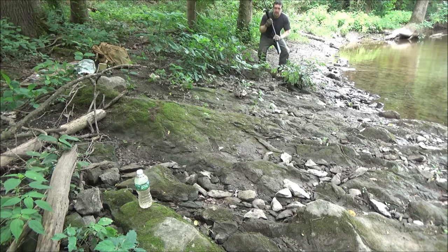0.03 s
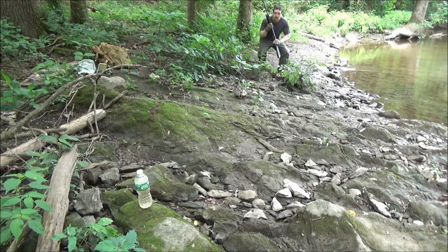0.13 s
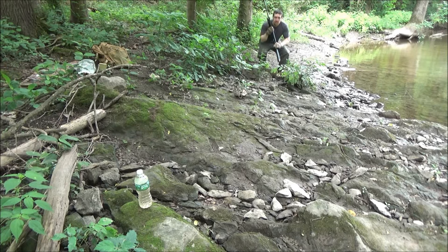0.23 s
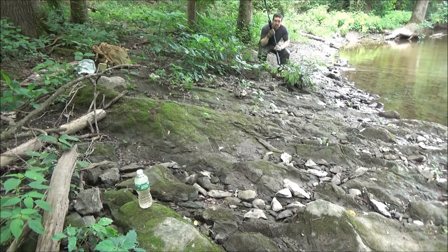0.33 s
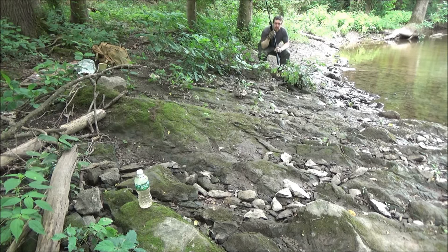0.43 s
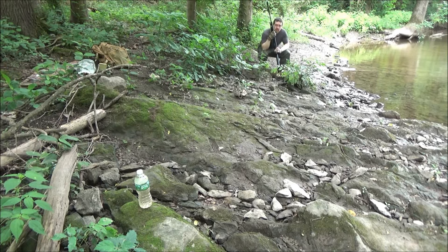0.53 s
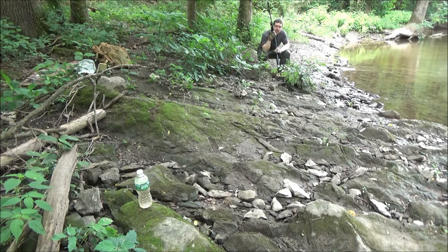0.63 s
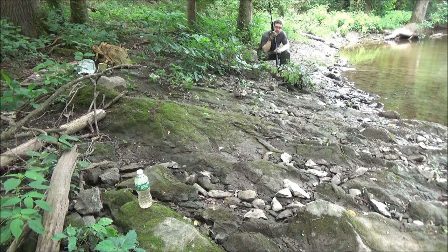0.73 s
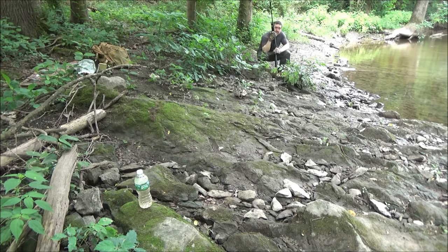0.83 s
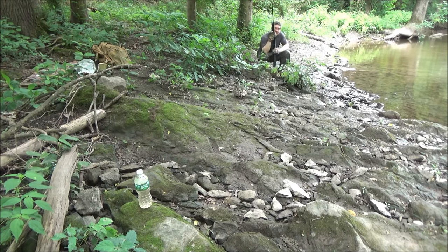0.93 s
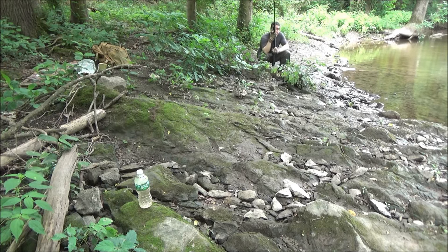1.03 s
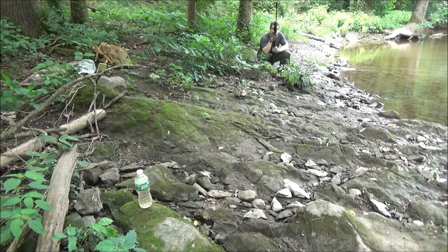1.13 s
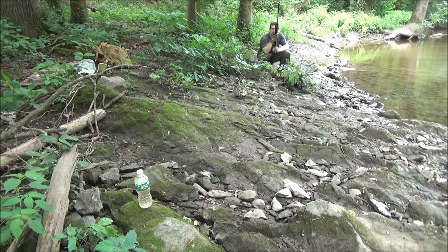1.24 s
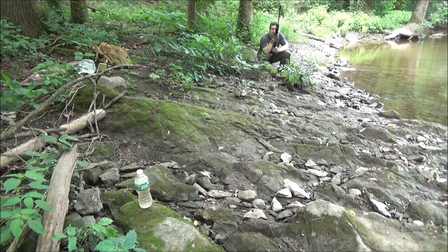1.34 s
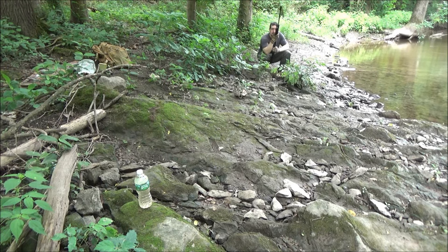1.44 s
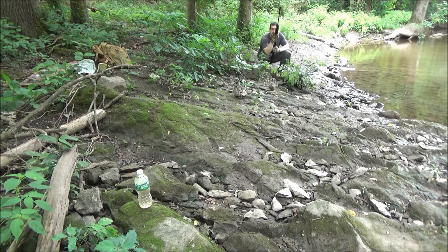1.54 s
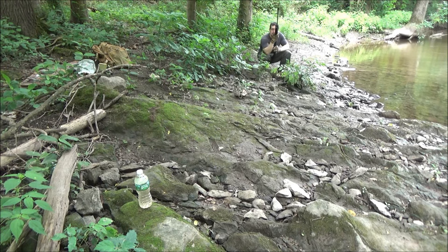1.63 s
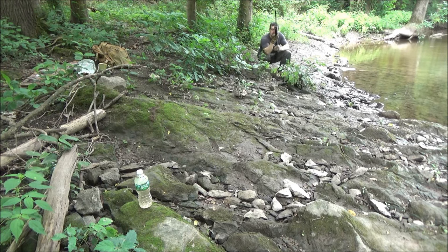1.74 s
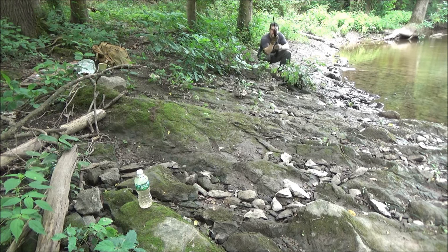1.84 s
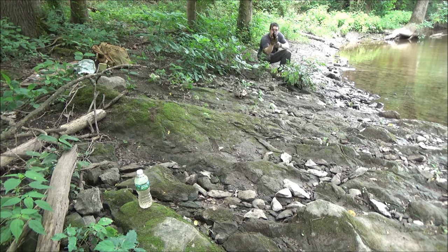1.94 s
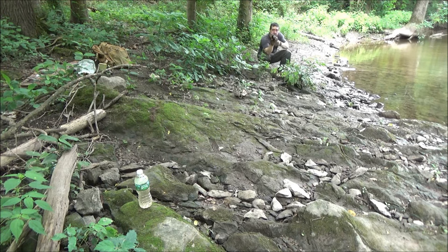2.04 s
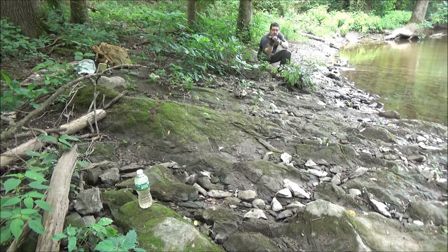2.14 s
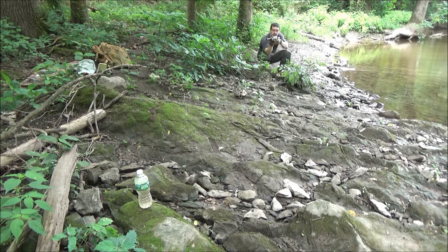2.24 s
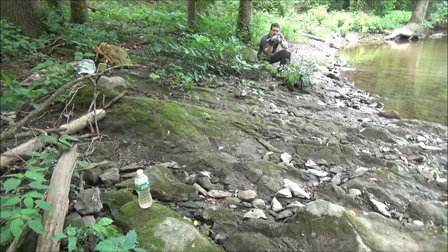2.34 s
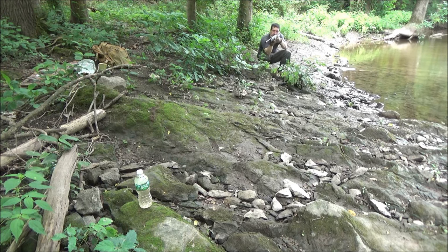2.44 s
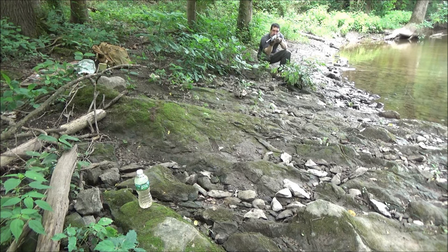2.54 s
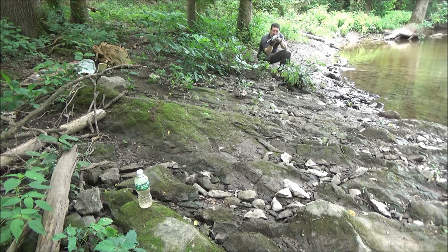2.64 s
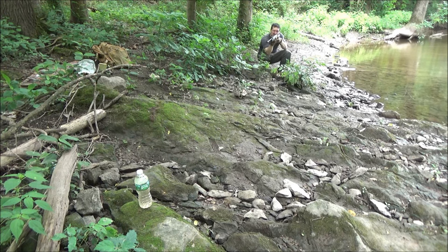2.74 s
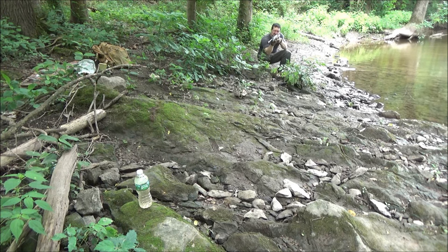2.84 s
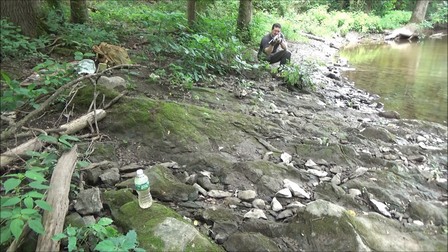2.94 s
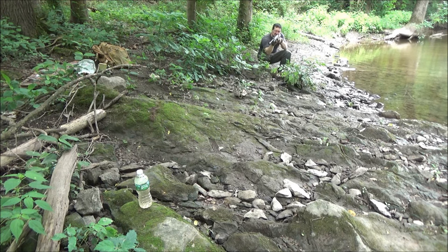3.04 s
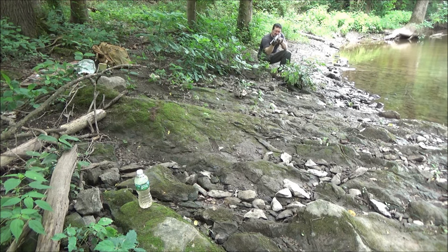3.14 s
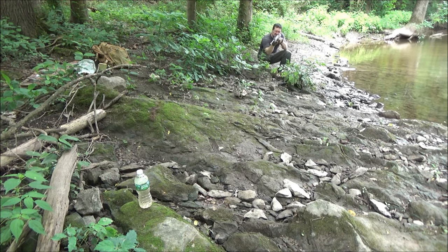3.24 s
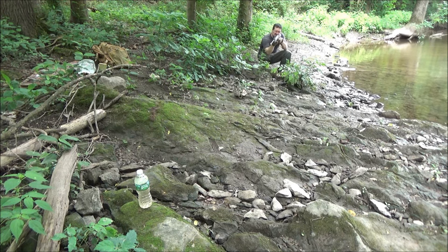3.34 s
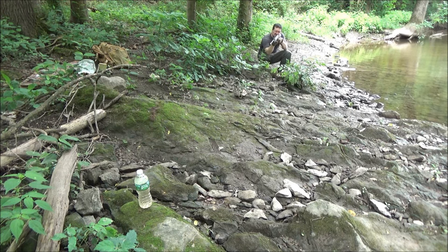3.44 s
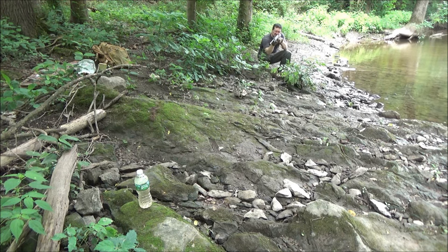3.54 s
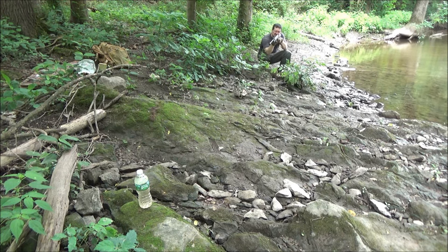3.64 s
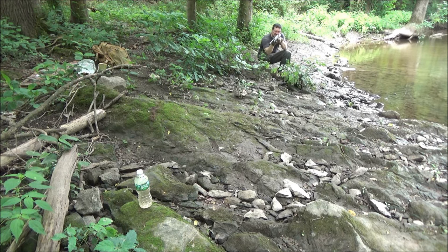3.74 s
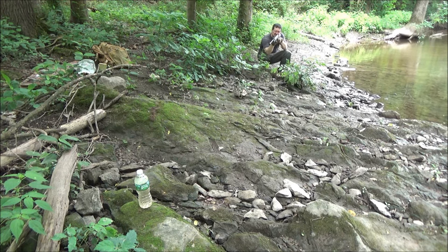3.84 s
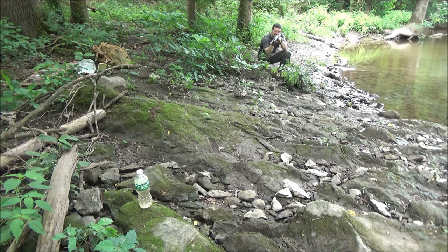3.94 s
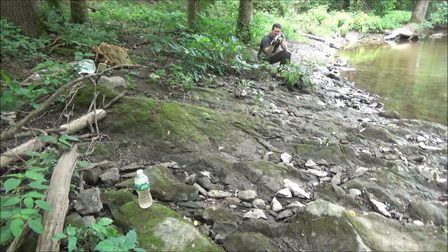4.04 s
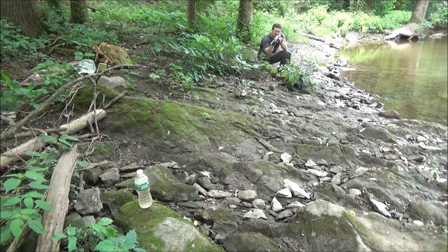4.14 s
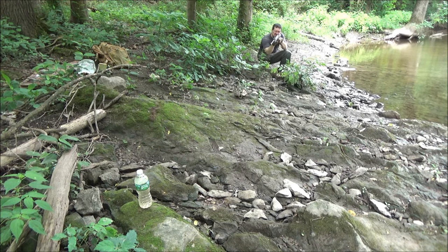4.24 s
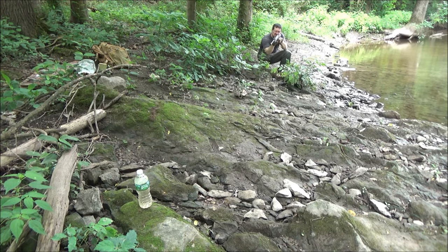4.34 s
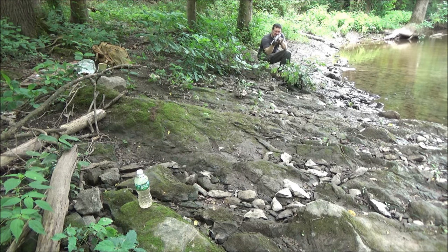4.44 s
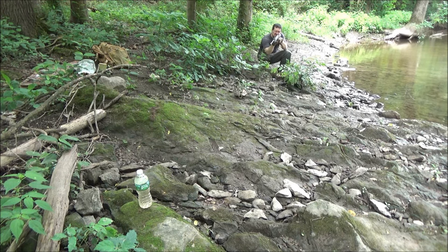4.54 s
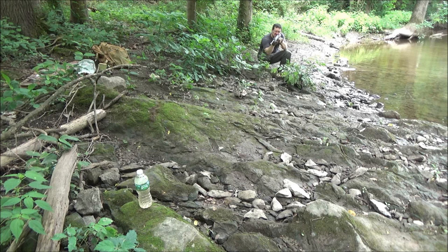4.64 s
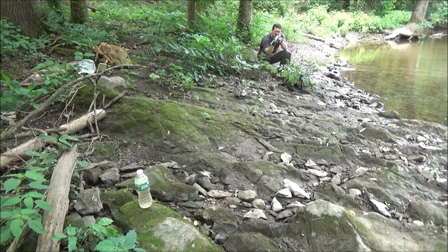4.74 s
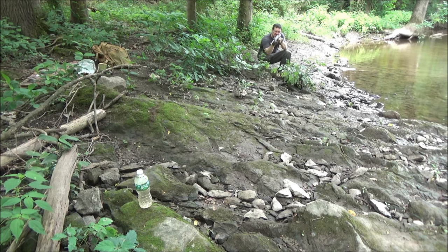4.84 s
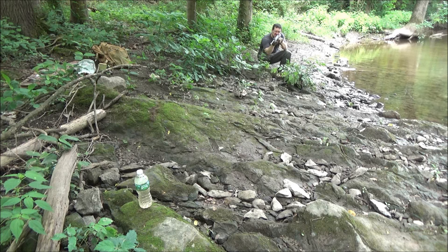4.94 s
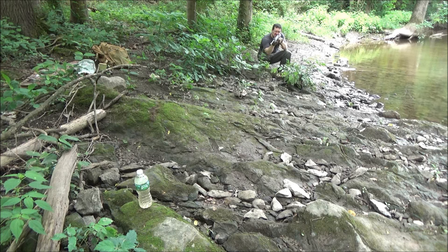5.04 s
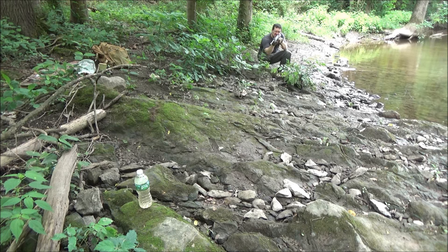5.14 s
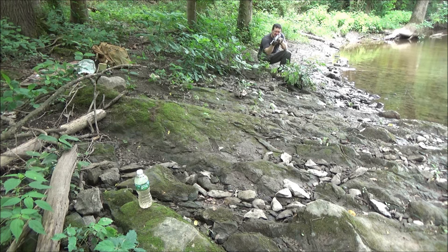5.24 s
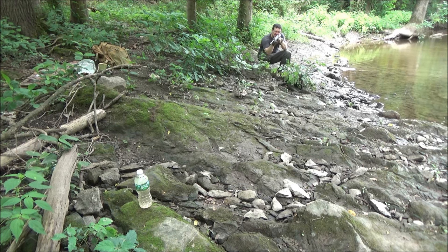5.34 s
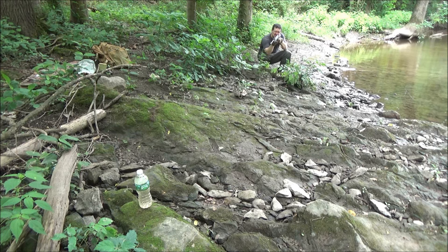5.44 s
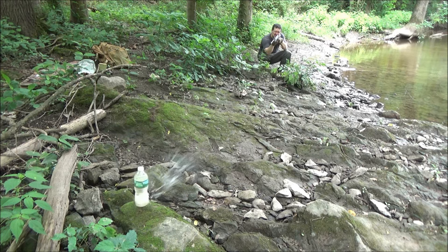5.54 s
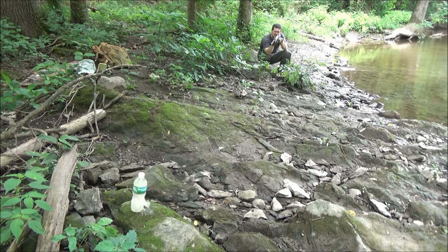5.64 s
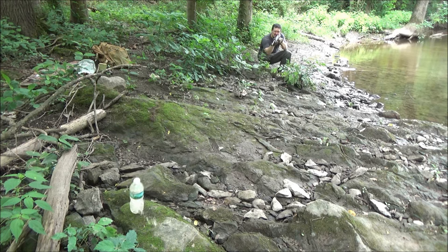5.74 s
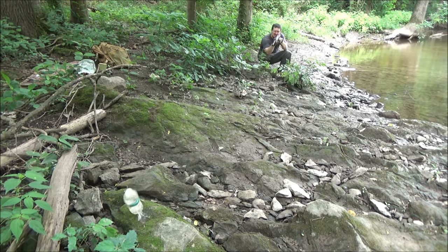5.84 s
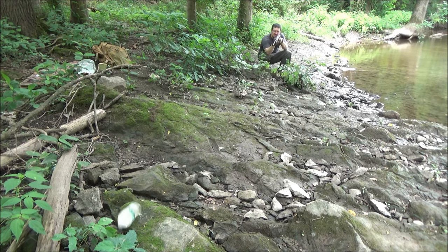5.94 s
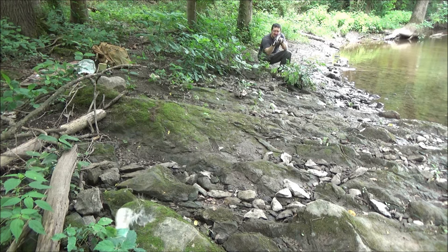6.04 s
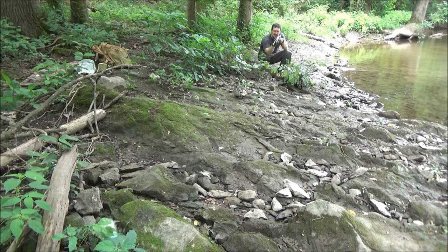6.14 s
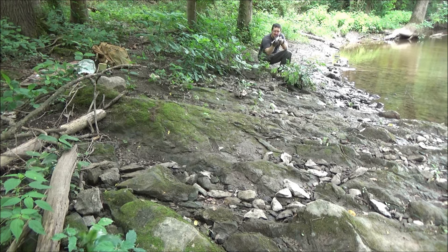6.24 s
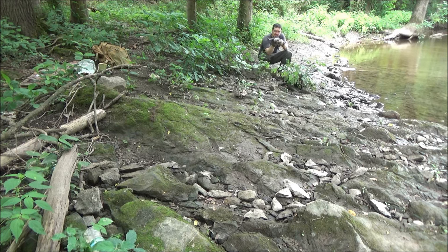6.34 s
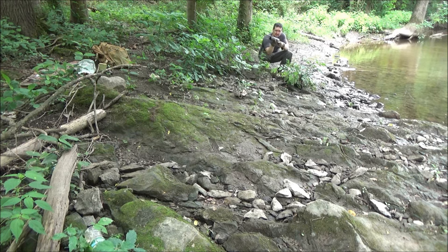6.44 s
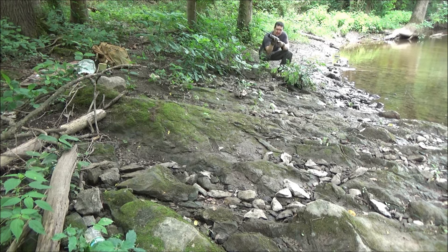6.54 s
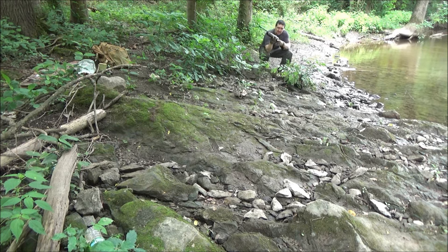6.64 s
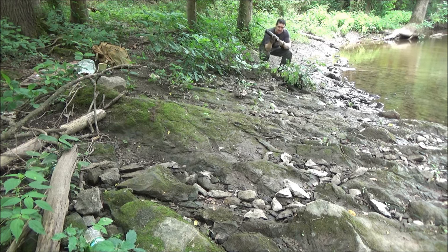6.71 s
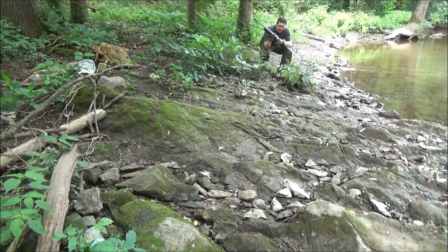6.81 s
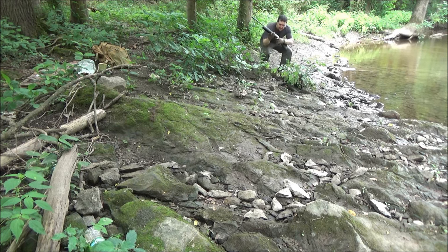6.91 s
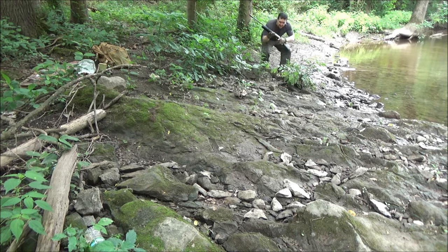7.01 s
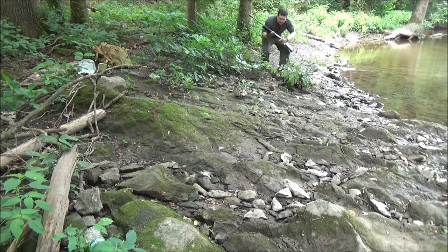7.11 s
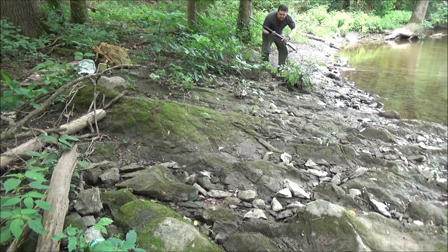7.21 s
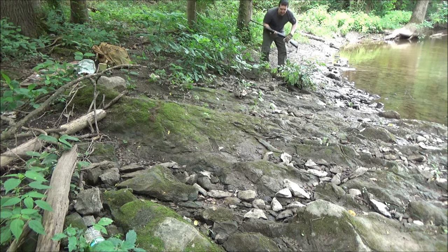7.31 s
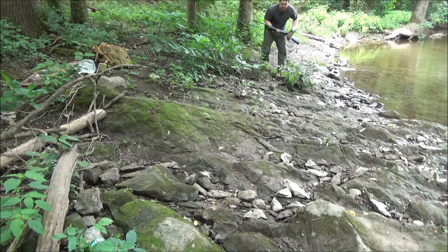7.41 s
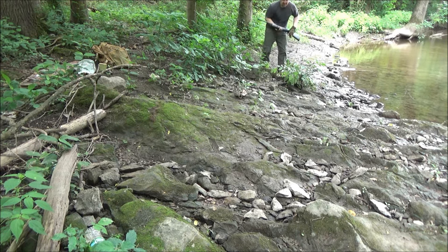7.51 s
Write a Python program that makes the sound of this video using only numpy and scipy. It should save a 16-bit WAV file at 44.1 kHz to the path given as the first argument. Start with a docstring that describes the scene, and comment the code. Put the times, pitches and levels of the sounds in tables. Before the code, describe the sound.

A creek rushes steadily over stones in a wood, with a light hiss and a faint low rumble. Through the first five and a half seconds birds give short whistles, paired chirps and high, sharp peeps, with a quick falling song at about 2.7 seconds. A twig snaps at 5 seconds. At 5.6 seconds an air rifle fires: one sharp crack merged with the pellet's smack on a plastic water bottle, by far the loudest sound. An echo spreads through the trees and fades over a second or so. The creek and everything else drop sharply in level at the shot and recover only slowly. At about 6.1 and 6.3 seconds the bottle tumbles onto stones with two dull, slightly crackly knocks. Very faint drops patter, and the rifle clicks softly around 6.7 and 6.9 seconds. The quieted creek continues until about 7.5 seconds.

```python
"""Air rifle by a woodland creek

A creek rushes over stones while birds whistle, chirrup, peep and sing, scattered by trunks and leaves.
A twig snaps. An air rifle fires at a water bottle: the report and the pellet's smack echo from the
trees, drops patter, the bottle tumbles off its rock and the rifle clicks as it is lowered.
The camera's gain control ducks at the shot and recovers only slowly."""
import sys
import numpy as np
from scipy import signal
from scipy.fft import rfft, irfft, next_fast_len
from scipy.io import wavfile
from scipy.ndimage import uniform_filter1d, map_coordinates

SR = 44100
rng = np.random.default_rng(int(sys.argv[2]) if len(sys.argv) > 2 else 0)


def inscribe(sig):
    """Save sig as 16-bit PCM at rate SR to the path in sys.argv[1].

    A 1-D sig is mono; a 2-D sig holds one channel per row.
    Samples are clipped to [-1, 1] before scaling.
    """
    pcm = np.round(np.clip(np.atleast_2d(sig).T, -1, 1) * 32767)
    wavfile.write(sys.argv[1], SR, pcm.astype(np.int16))


N = 333837


def amp(db):
    """Decibels to gain."""
    return 10 ** (np.asarray(db) / 20)


def unit(x):
    """Scale to rms 1."""
    return x / np.sqrt(np.mean(x ** 2) + 1e-20)


def along(points, hz):
    """Interpolate (freq_hz, value) points on a log frequency axis."""
    freqs_hz, values = np.transpose(points)
    return np.interp(np.log(hz + 1), np.log(freqs_hz + 1), values)


def clock(length_s):
    """Sample times in seconds."""
    return np.arange(int(length_s * SR)) / SR


def add(track, start_s, sound):
    """Mix a sound into the track."""
    span = track[round(start_s * SR):][:len(sound)]
    span += sound[:len(span)]


def wobble(rate_hz):
    """Smooth random curve, rate_hz knots a second."""
    return map_coordinates(rng.standard_normal(1024), [np.arange(N) * rate_hz / SR], mode="wrap")


def filtered(x, response):
    """Apply the gain response(hz)."""
    size = x.shape[-1]
    padded = next_fast_len(size + 8192)
    gain = response(np.fft.rfftfreq(padded, 1 / SR))
    return irfft(rfft(x, padded) * gain, padded)[..., :size]


def noise(spectrum, size):
    """Noise of rms 1 shaped by (freq_hz, density_db) points."""
    return unit(filtered(rng.standard_normal(size), lambda hz: amp(along(spectrum, hz))))


def band(centre_hz, width_oct, size):
    """Noise of rms 1 in a bell-shaped band."""
    bell = lambda hz: np.exp(-0.5 * (np.log2((hz + 1) / centre_hz) / width_oct) ** 2)
    return unit(filtered(rng.standard_normal(size), bell))


def burst(x, t60_s, rise_s=0.00042):
    """Give noise a sharp attack to near rms 1 and an exponential decay."""
    t = np.arange(len(x)) / SR
    envelope = amp(-60 * t / t60_s) * (1 - np.exp(-(t / rise_s) ** 2))
    return unit(x * envelope) * np.sqrt(np.mean(envelope ** 2))


def fading(x, envelope):
    """Apply the gain envelope(hz, t)."""
    hz, t, spectra = signal.stft(x, SR, nperseg=256)
    return signal.istft(spectra * envelope(hz[:, None], t), SR, nperseg=256)[1]


def eddies(x, depth_db):
    """Eddies lift and drop patches of the spectrum."""
    spectra = signal.stft(x, nperseg=512)[2]
    patches = uniform_filter1d(rng.standard_normal(spectra.shape), size=6, axis=0)
    patches = uniform_filter1d(patches, size=12, axis=1)
    return unit(signal.istft(spectra * amp(depth_db * unit(patches)), nperseg=512)[1][:N])


# Level curves: time_s, level_db
ROAR_LEVEL = [(0.03, -18), (0.18, -17.5), (1.31, -19.5), (2.44, -19.5), (2.73, -20.5), (5.35, -19.5),
              (5.5, -20)]
RUMBLE_LEVEL = [(0, -30), (2.9, -29), (5.5, -29.5), (6.2, -34.5), (7.5, -28.5)]
# Spectra: freq_hz, density_db
ROAR_SPECTRUM = [(150, -25), (250, -10), (440, -7.5), (700, -1.5), (930, 0.5), (1400, -2.5), (2000, -7.5),
                 (3000, -15.5), (4000, -22), (8000, -73)]
HISS_SPECTRUM = [(1200, -26), (2200, -3), (3000, 2), (3450, -4.5), (3900, -19), (4700, -18), (5500, -15.5),
                 (6300, -15.5), (7300, -21), (10000, -25.5), (16000, -26.5)]
RUMBLE_SPECTRUM = [(12, -39), (20, -10), (60, 0.5), (123, -0.5), (214, 2), (278, -8.5), (319, -2.5),
                   (400, -18), (520, -27), (880, -120)]

def creek(hum_hz=63.2):
    """Water roars over stones under a fluttering hiss, above a far rumble with a wavering hum."""
    t = np.arange(N) / SR
    roar_db = np.interp(t, *np.transpose(ROAR_LEVEL)) + 0.64 + 0.14 * wobble(7)
    roar = amp(roar_db) * eddies(noise(ROAR_SPECTRUM, N), depth_db=0.81)
    hiss = amp(-27.5 + 0.34 * wobble(4.99)) * eddies(noise(HISS_SPECTRUM, N), depth_db=1.87)
    hum = amp(-11 + wobble(2.6)) * np.sin(2 * np.pi * hum_hz * t + 0.62 * wobble(3.7))
    rumble_db = np.interp(t, *np.transpose(RUMBLE_LEVEL))
    rumble = amp(rumble_db) * (noise(RUMBLE_SPECTRUM, N) + hum)
    return roar + hiss + rumble


def camera_whine(pitch_hz=15734, level_db=-57):
    """The camera adds a thin, steady tone."""
    return amp(level_db) * np.sin(2 * np.pi * pitch_hz * np.arange(N) / SR)


# Decay of the wood's scatter: freq_hz, t60_s
WOOD_DECAY = [(300, 1.2), (3000, 1.14), (6500, 1.22), (12000, 0.95)]

def scattered(sound, wet_db, decay=WOOD_DECAY):
    """Direct sound plus scatter from trunks, leaves or rocks, by a new random path each time."""
    tail = fading(rng.standard_normal(SR), lambda hz, t: amp(-60 * t / along(decay, hz)))
    path = amp(wet_db) * tail / np.linalg.norm(tail)
    path[0] += 1
    return signal.fftconvolve(sound, path / np.linalg.norm(path))


def slide(held_hz, offset_oct, length_s, settle_share=0.27):
    """Pitch path that starts off its note and settles on it."""
    return held_hz * 2 ** (offset_oct * np.exp(-clock(length_s) / (settle_share * length_s)))


def bird_note(pitch_hz, waver=0.012, skew=0.69):
    """A wavering sine on a pitch path; opens quickly, closes more slowly."""
    size = len(pitch_hz)
    shake = signal.resample(rng.standard_normal(130), SR)[:size]
    phase = 2 * np.pi * np.cumsum(pitch_hz * (1 + waver * shake)) / SR
    envelope = np.sqrt(np.sin(np.pi * (np.arange(size) / size) ** skew))
    return unit(envelope * np.sin(phase))


# Far whistles: start_s, length_s, held_hz, offset_oct, level_db
WHISTLES = [(.04, 0.22, 4110, 0, -42), (0.084, 0.043, 3306, -0.144, -24.5),
            (1.07, 0.088, 2550, -0.074, -20.5), (1.797, 0.067, 2805, -0.072, -23),
            (1.927, 0.1003, 2534, 0.25, -19), (2.424, 0.111, 2408, -.15, -21), (3.285, 0.053, 6960, 0, -38),
            (3.43, 0.055, 3430, -0.072, -26.5), (3.524, 0.4, 7800, -0.051, -49),
            (3.602, 0.033, 2814, .15, -21.5), (4.098, 0.128, 2542, -.08, -23.5),
            (4.24, 0.033, 2264, .1, -24.5), (4.89, 0.19, 7060, 0.21, -34.5),
            (5.16, 0.051, 2890, -0.028, -24), (5.216, .045, 2510, 0.125, -29),
            (5.515, 0.04, 3870, -0.079, -32), (5.557, 0.048, 2986, -.12, -17.5),
            (7.17, 0.27, 7400, -.03, -50)]

def whistles():
    """Birds deeper in the wood slide up or down onto a note and hold it."""
    out = np.zeros(N)
    for start_s, length_s, held_hz, offset_oct, level_db in WHISTLES:
        whistle = bird_note(slide(held_hz, offset_oct, length_s))
        add(out, start_s, amp(level_db) * scattered(whistle, wet_db=5))
    return out


# Chip pairs: start_s, spacing_s, pitch_hz, level_db
CHIRRUPS = [(.262, .049, 3070, -18), (1.211, 0.053, 3120, -23), (1.714, 0.047, 2917, -21),
            (3.245, 0.057, 3100, -20.5), (3.83, 0.063, 3065, -19), (4.762, 0.077, 3105, -20.5)]

def chirrups(chip_s=0.0231, dip=0.114, rasp_db=-5):
    """A bird gives two raspy chips; each dips to its pitch and flicks up again."""
    out = np.zeros(N)
    progress = clock(chip_s) / chip_s
    contour = 1 + dip * (2 * progress - 1) ** 2
    for start_s, spacing_s, pitch_hz, level_db in CHIRRUPS:
        for onset_s in start_s, start_s + spacing_s:
            rasp = amp(rasp_db) * np.sin(np.pi * progress) * band(3300, 0.094, len(progress))
            chip = bird_note(pitch_hz * contour) + rasp
            add(out, onset_s, amp(level_db) * scattered(chip, wet_db=0.5))
    return out


def through_leaves(call, t60_s):
    """Foliage round the perch blurs a call and keeps its energy."""
    blurred = signal.fftconvolve(call, burst(rng.standard_normal(SR // 8), t60_s))
    return blurred * np.linalg.norm(call) / np.linalg.norm(blurred)


# Sharp rising calls: start_s, top_hz, level_db
PEEPS = [(0.727, 6527, -18.5), (2.069, 6630, -17.5), (2.476, 6640, -18.5), (3.355, 6565, -19),
         (4.868, 6436, -18.5)]

def peeps(length_s=0.0363, sweep=0.1385):
    """A near bird leaps to a top pitch and holds it; tone, rasp and hiss scatter separately."""
    out = np.zeros(N)
    progress = clock(length_s) / length_s
    size = len(progress)
    envelope = np.sin(np.pi * progress) ** 0.53
    for start_s, top_hz, level_db in PEEPS:
        pitch_hz = top_hz * (1 - sweep * (1 - progress) ** 3)
        tone = np.sqrt(2) * np.sin(2 * np.pi * np.cumsum(pitch_hz) / SR)
        rasp = amp(-16) * band(4300, 0.35, size) + amp(-32) * band(9600, 0.04, size)
        hiss = amp(-10) * band(5940, 0.1, size)
        for part in tone, rasp, hiss:
            call = through_leaves(amp(level_db + 3) * envelope * part, t60_s=0.14)
            add(out, start_s, scattered(call, wet_db=4.5))
    return out


# Notes trilled too fast to follow: start_s, length_s, centre_hz, level_db
BUZZES = [(2.676, 0.074, 3500, -23.5), (2.983, .12, 4040, -35)]

def falling_song(start_s=2.64, step_s=0.11, top_hz=4070, floor_hz=1786, fall_s=0.3,
                 crest_s=0.25, swell_db_per_s=79, fade_db_per_s=49):
    """Five down-slurred notes step lower, swelling then fading, joined by two buzzes."""
    out = np.zeros(N)
    for t in step_s * np.arange(5):
        held_hz = floor_hz + (top_hz - floor_hz) * np.exp(-t / fall_s)
        level_db = -16.5 - max(swell_db_per_s * (crest_s - t), fade_db_per_s * (t - crest_s))
        slur_hz = slide(held_hz, offset_oct=0.145, length_s=0.088)
        add(out, start_s + t, amp(level_db) * bird_note(slur_hz, waver=0.0175))
    for onset_s, length_s, centre_hz, level_db in BUZZES:
        envelope = np.sqrt(np.hanning(len(clock(length_s))))
        add(out, onset_s, amp(level_db) * envelope * band(centre_hz, 0.09, len(envelope)))
    return scattered(out, wet_db=3)[:N]


# Dry snaps and clicks: start_s, level_db, t60_s, centre_hz, width_oct
TICKS = [(5.0231, 1, 0.0091, 3060, 0.14), (6.734, -10.5, 0.055, 2200, 0.8), (6.934, -11, 0.033, 2640, 0.13),
         (6.944, -12, 0.033, 3420, .07)]

def ticks():
    """A twig snaps; later the rifle clicks as it is lowered."""
    out = np.zeros(N)
    for start_s, level_db, t60_s, centre_hz, width_oct in TICKS:
        add(out, start_s, amp(level_db) * burst(band(centre_hz, width_oct, SR // 8), t60_s))
    return scattered(out, wet_db=-6.5)[:N]


# Rifle and pellet bursts: start_s, level_db, t60_s, centre_hz, width_oct, treble_db
SHOT_BURSTS = [(5.6175, 6.5, 0.039, 1210, 0.53, -20), (5.621, 6.5, 0.029, 4520, 0.84, -7),
               (5.625, 6.5, .035, 5850, .15, -17.5), (5.6293, 26.5, 0.011, 1510, 0.96, -11),
               (5.6372, 20.5, 0.0075, 1100, 1.3, -18)]
# Low pushes from the struck bottle and its water: start_s, level_db, pitch_hz, tau_s
BOTTLE_PUSHES = [(5.6295, 24, 420, 0.00076), (5.6375, 14.5, 610, 0.00076), (5.638, 3, 150, 0.0036)]

def rifle_shot():
    """The action thumps, the muzzle cracks and hisses, the pellet smacks twice; rocks scatter it all."""
    out, size = np.zeros(N), SR // 8
    for start_s, level_db, t60_s, centre_hz, width_oct, treble_db in SHOT_BURSTS:
        blast = band(centre_hz, width_oct, size) + amp(treble_db) * band(10000, 0.72, size)
        add(out, start_s, amp(level_db) * burst(blast, t60_s))
    t = clock(0.1)
    for start_s, level_db, pitch_hz, tau_s in BOTTLE_PUSHES:
        add(out, start_s, amp(level_db) * np.sin(2 * np.pi * pitch_hz * t) * np.exp(-t / tau_s))
    return scattered(out, wet_db=-10, decay=[(300, 0.078), (6000, 0.28)])[:N]


# The shot among the trees
ECHO_SPECTRUM = [(88, -59), (150, -23), (249, -17), (315, -17.5), (354, -11), (555, -12.5), (649, -10),
                 (854, -9.5), (923, -9.5), (3290, 2), (4240, -10.5), (6140, -4.5), (16000, -24.5)]  # freq_hz, density_db
ECHO_SWELL = [(600, 0.3), (1500, 0.17), (2800, 0.072), (6000, 0.046), (12000, 0.037)]  # freq_hz, build_up_s
ECHO_DECAY = [(600, 2), (2500, 1.6), (6000, 1.32), (12000, 0.95)]  # freq_hz, t60_s

def forest_echo(start_s=5.656, level_db=-8, grain_db=0.8):
    """Ever more trunks return the shot, so the echo swells, then fades; treble comes and goes first."""
    def envelope(hz, t):
        build_up_s = along(ECHO_SWELL, hz)
        swell = 1 - np.exp(-(t / build_up_s) ** 0.67)
        return swell * amp(-60 * (t - build_up_s) / along(ECHO_DECAY, hz))

    out, size = np.zeros(N), 2 * SR
    trunks = amp(grain_db * wobble(117.6)[:size]) * noise(ECHO_SPECTRUM, size)
    tail = fading(trunks, envelope)
    t = np.arange(len(tail)) / SR
    far_bank_db = 2 * np.exp(-((t - 0.18) / 0.038) ** 2)
    add(out, start_s, amp(level_db) * unit(tail * amp(far_bank_db)))
    return out


# Single drips ticking on leaves and stone: start_s, level_db
DRIPS = [(6.32, -20), (6.639, -25), (7.026, -27), (7.249, -27)]

def spray(start_s=5.98, count=26, mean_wait_s=0.3):
    """Drops flung from the pierced bottle patter on leaves and stone, ever more rarely."""
    out = np.zeros(N)
    patter = [(start_s + mean_wait_s * wait, -28 + 3 * min(weight, 2))
              for wait, weight in rng.exponential(size=(count, 2))]
    for onset_s, level_db in DRIPS + patter:
        add(out, onset_s, amp(level_db) * burst(band(11400, 0.3, SR // 32), t60_s=0.011))
    return out


# Landings on the stones: start_s, rattle_s, level_db
LANDINGS = [(6.1313, .05, 9), (6.2653, .022, 3.5)]
# Knock of the water-filled bottle: freq_hz, density_db
KNOCK_SPECTRUM = [(60, -60), (140, -29), (230, -17), (310, -1), (500, -2.5), (850, 3.5), (1200, -7),
                  (1450, 3), (1900, -6.5), (2200, 0.5), (3050, -6.5), (3700, -19.5), (6300, -20),
                  (8000, -29), (12000, -60)]

def bottle_tumble(spacing_s=0.0089, jitter_s=0.0005, buckle_s=6.158, buckle_width_s=0.004):
    """Each landing is a quick run of dull knocks; the thin wall crackles, most where it buckles."""
    out, size = np.zeros(N), SR // 8
    for start_s, rattle_s, level_db in LANDINGS:
        for t in np.arange(0, rattle_s, spacing_s):
            lateness, crispness = rng.standard_normal(2)
            buckle_db = 6.5 * np.exp(-((start_s + t - buckle_s) / buckle_width_s) ** 2)
            crackle_db = -17 + 3 * crispness + buckle_db
            knock = burst(noise(KNOCK_SPECTRUM, size), t60_s=0.035)
            crackle = amp(crackle_db) * burst(band(8000, 1.0, size), t60_s=0.016)
            contact_db = level_db - 2.5 * (t == 0)  # softer first contact
            add(out, start_s + t + jitter_s * lateness, amp(contact_db) * (knock + crackle))
    return scattered(out, wet_db=-11.5, decay=[(300, 0.26), (6000, 0.94)])[:N]


def scene():
    """Stereo mix: all centred except a faint high hiss."""
    shot = rifle_shot()
    birds = peeps() + chirrups() + whistles() + falling_song()
    middle = creek() + birds + shot + forest_echo() + bottle_tumble() + spray() + ticks() + camera_whine()
    side = amp(-56) * band(11900, 0.37, N)
    return np.array([middle + side, middle - side])


def gain_control(x, limit_db=1, deepest_db=-18, recovery_db_per_s=2.02, lookahead_s=0.028):
    """The gain drops just ahead of a loud sound, as far as its range allows, and creeps back."""
    t = np.arange(N) / SR
    power = np.abs(uniform_filter1d(x.mean(0) ** 2, size=220))
    needed_db = np.clip(limit_db - 10 * np.log10(power + 1e-12), deepest_db, 0)
    recovery_db = recovery_db_per_s * t
    held_db = np.minimum.accumulate(needed_db - recovery_db) + recovery_db
    return x * amp(np.interp(t + lookahead_s, t, held_db))


def record(dry):
    """Gain control, overload on the sharpest peaks, and the camera's band limit."""
    clipped = np.clip(gain_control(dry), -0.95, 0.95)
    return filtered(clipped, lambda hz: hz < 15950)


dry = scene()
out = record(dry)
inscribe(out)
```